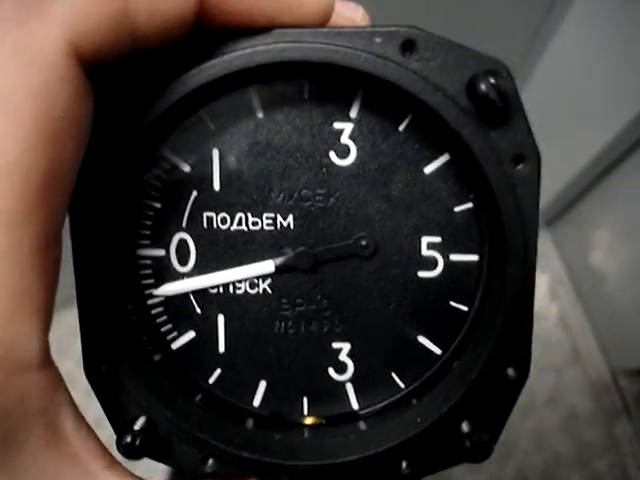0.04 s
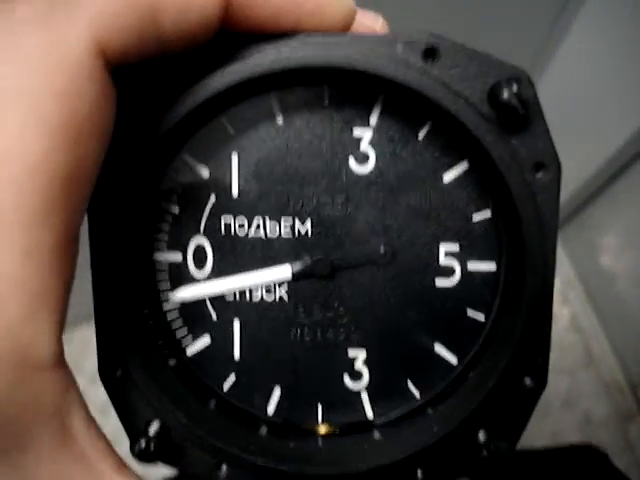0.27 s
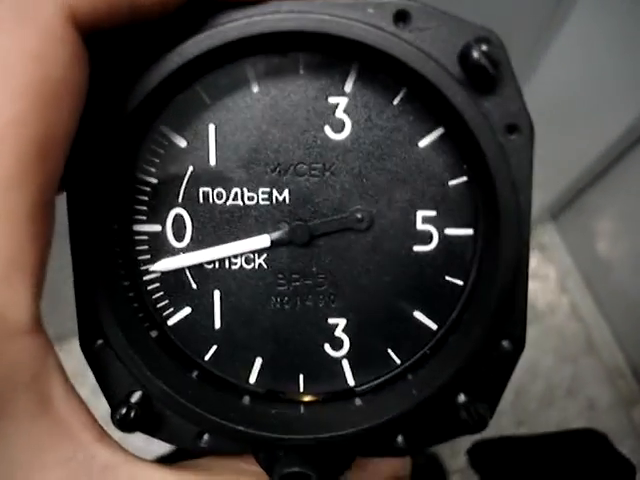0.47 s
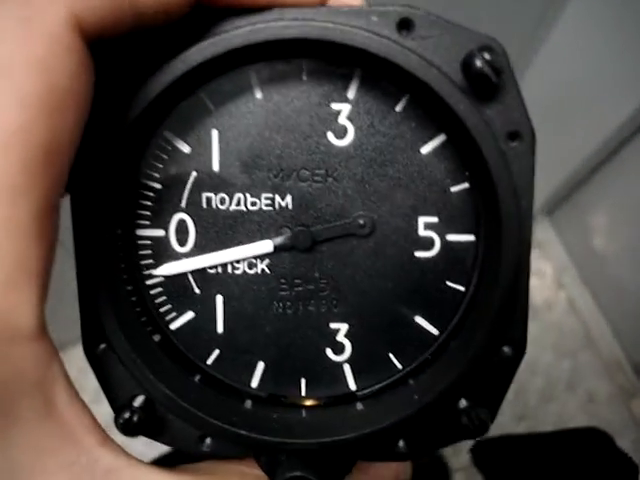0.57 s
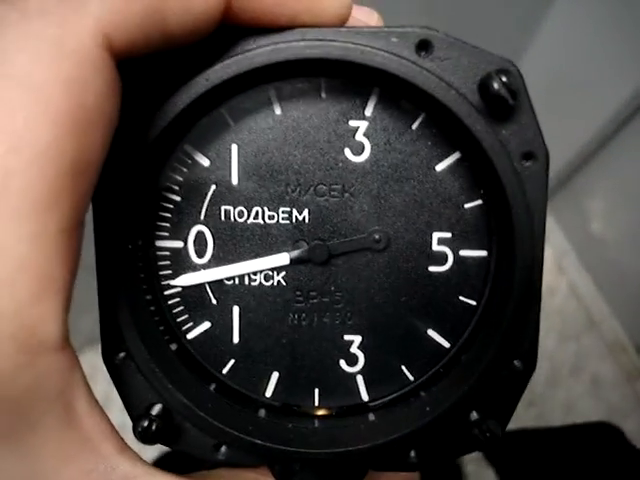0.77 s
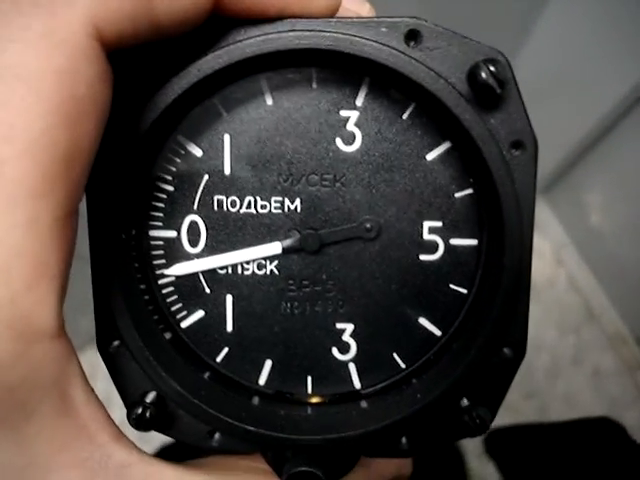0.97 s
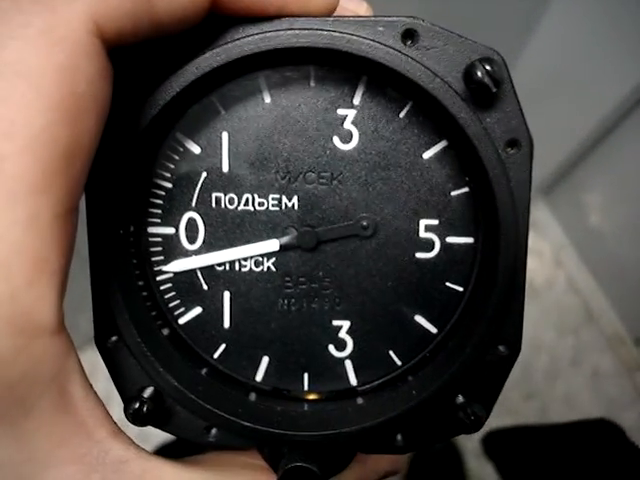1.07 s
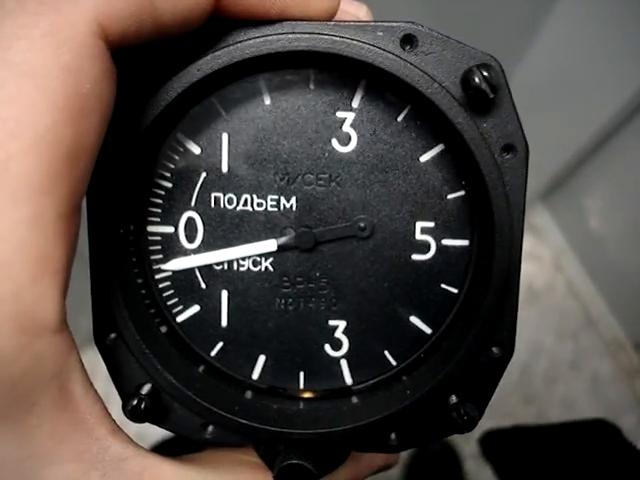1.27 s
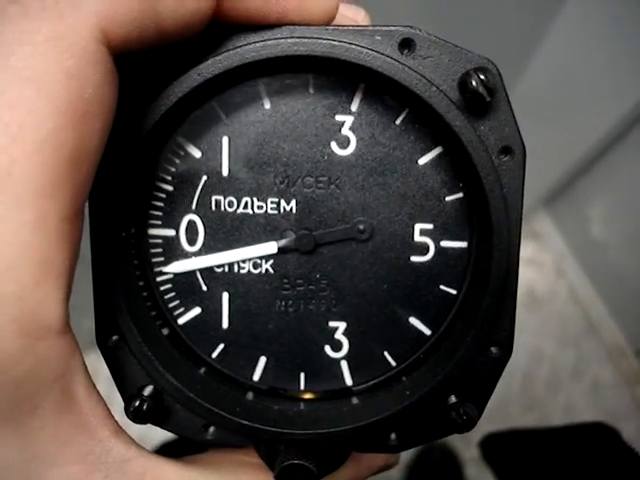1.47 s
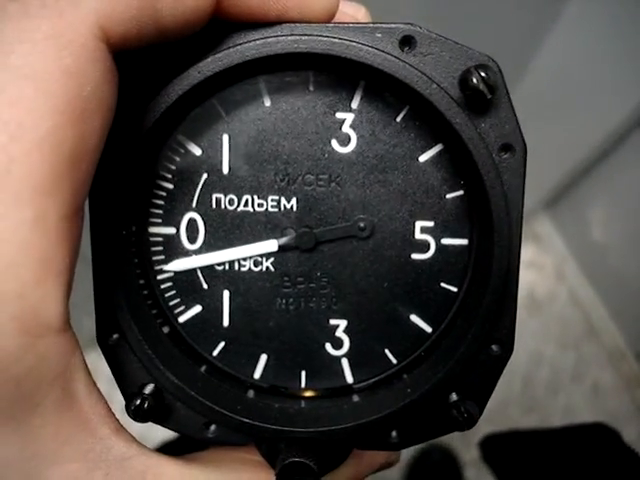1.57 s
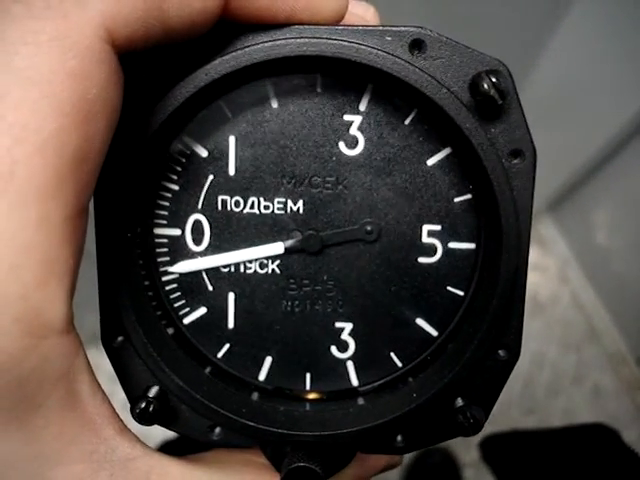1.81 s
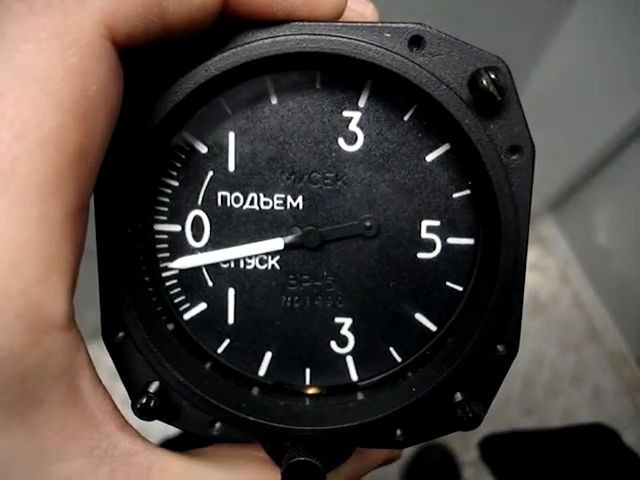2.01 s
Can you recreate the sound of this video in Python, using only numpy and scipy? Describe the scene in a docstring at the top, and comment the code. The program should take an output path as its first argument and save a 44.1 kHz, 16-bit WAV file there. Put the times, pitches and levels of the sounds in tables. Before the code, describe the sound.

A freight elevator's sliding door clanks, rumbles along its track and booms to a stop.

```python
"""A sliding door clanks three times, rumbles and scrapes along its track and booms against its stop,
heard inside a steel freight lift. Impacts excite damped modes of the door and the car walls;
rolling and friction radiate noise. Before the door moves, the drive dies away, a hollow knock
sounds and the lock releases with a thump. Afterwards the car rings on over a faint electrical hum."""
import sys
import numpy as np
from scipy import signal
from scipy.fft import rfft, irfft, next_fast_len
from scipy.io import wavfile
from scipy.ndimage import uniform_filter1d

SR = 44100
rng = np.random.default_rng(int(sys.argv[2]) if len(sys.argv) > 2 else 0)


def unload_wav(signal):
    """Save mono or channel-first audio to the path in sys.argv[1] as 16-bit WAV at rate SR, clipped to [-1, 1]."""
    wavfile.write(
        sys.argv[1],
        SR,
        np.round(np.clip(np.atleast_2d(signal).T, -1, 1) * 32767).astype(np.int16),
    )


N = 90404
T = np.arange(N) / SR


def undb(db):
    """Amplitude ratio of a level in decibels."""
    return 10 ** (np.asarray(db) / 20)


def at(table, hz):
    """Interpolation on a logarithmic frequency axis."""
    f, values = np.array(table, float).T
    return np.interp(np.log(np.maximum(hz, 1)), np.log(f), values)


def unit(x):
    """Normalisation to rms 1."""
    return x / np.std(x)


def colour(x, spectrum):
    """Spectral shaping by a table of relative levels, at rms 1."""
    size = next_fast_len(N)
    gain = undb(at(spectrum, np.arange(size // 2 + 1) * SR / size))
    return unit(irfft(rfft(x, size) * gain, size)[:N])


def noise(spectrum):
    """Spectrally shaped Gaussian noise at rms 1."""
    return colour(rng.standard_normal(N), spectrum)


def walk(rate):
    """Smooth random fluctuation of spread 1, with `rate` new values a second."""
    step = max(int(SR / rate), 2)
    stairs = np.repeat(rng.standard_normal(N // step + 1), step)
    return unit(uniform_filter1d(stairs, step)[:N])


def grains(spread_db, rate):
    """Dense tiny contacts of uneven strength, as amplitude-modulated noise."""
    return unit(rng.standard_normal(N) * undb(spread_db * walk(rate)))


def tone(hz, waver_rad, rate):
    """Sinusoid with random phase modulation, at rms 1."""
    return np.sqrt(2) * np.sin(2 * np.pi * hz * T + waver_rad * walk(rate))


def rise(start, length):
    """Linear attack from 0 to 1."""
    return np.clip((T - start) / length, 0, 1)


def fade(start, t60):
    """Exponential decay of 60 dB in t60 seconds."""
    return np.exp(-np.log(1000) * np.maximum(T - start, 0) / t60)


def envelope(curve):
    """Gain along a level curve, silent before it and decaying after it."""
    times, db = np.array(curve).T
    return undb(np.interp(T, times, db)) * rise(times[0], 0.034) * fade(times[-1], 0.89)


def ring(start, modes, attack, waver_rad):
    """Superposition of damped modes; reflections in the car make each phase waver."""
    onset = int(start * SR)
    count = N - onset
    motion = 0
    for i, (hz, db, t60) in enumerate(modes):
        phase = 2 * np.pi * hz * T[:count] + waver_rad * walk(45.2)[onset:]
        motion += (-1) ** i * undb(db) * fade(0, t60)[:count] * np.sin(phase)
    return np.pad(motion, (onset, 0)) * rise(start, attack)


def walls(start, spectrum, attack, t60_scale, echo_db, echo_t60, spread_db):
    """Modal overlap: wall modes merge into noise, each octave decays at its own rate, the shaft echoes."""
    # decay of the steel car: f/Hz, T60/s before t60_scale
    decay = [(60, 0.49), (300, 0.97), (1000, 0.2), (2500, 0.31), (8000, 0.16)]
    rest = colour(grains(spread_db, 900), spectrum)
    echo = undb(echo_db) * noise(spectrum) * fade(start, echo_t60) * rise(start, 0.048)
    wash = 0
    for hz in np.geomspace(75, 9600, 8):
        band = signal.sosfiltfilt(signal.butter(2, hz * np.sqrt(2), fs=SR, output="sos"), rest)
        rest = rest - band
        wash += band * fade(start + attack, t60_scale * at(decay, hz))
    return wash * rise(start, attack) + echo


def shaft_air():
    """Air in the shaft gives stationary broadband noise."""
    # air spectrum: f/Hz, relative level/dB
    spectrum = [(18, -20.5), (30, 0), (195, -11.5), (295, -15), (424, -19.5), (503, -17.5), (994, -21.5),
                (2630, -25.5), (3270, -25), (10000, -36.5), (13000, -72), (22000, -120)]
    return undb(-51.5) * noise(spectrum)


def hum():
    """Electrical hum and a thin whine: narrow spectral lines with slight random modulation."""
    # faint partials: f/Hz, level/dB
    partials = [(43, -60.5), (88, -65.5), (497, -67.5)]
    # course of the strongest partial: t/s, level/dB
    main_curve = [(0, -41.5), (.2, -63), (.4, -35.5), (.6, -46), (1.3, -47), (1.6, -48.5), (1.73, -66),
                  (1.83, -69.5), (1.93, -56.5), (2.05, -63.5)]
    faint = sum(undb(db + 0.86 * walk(23)) * tone(hz, waver_rad=0.5, rate=9.2) for hz, db in partials)
    main = envelope(main_curve) * tone(hz=288.5, waver_rad=0.41, rate=12)
    whine = undb(-68) * tone(hz=3180, waver_rad=0.66, rate=110)
    return faint + main + whine


def drive():
    """The noise of the drive decays exponentially as it runs down."""
    # drive spectrum: f/Hz, relative level/dB
    spectrum = [(25, -3), (42, 5), (70, -5.5), (150, -1.5), (230, -11.5), (400, -9), (560, -15.5),
                (1120, -20), (1600, -22), (5300, -29), (10000, -46.5)]
    stop_s, time_constant_s = 0.2, 0.3
    return undb(-37) * noise(spectrum) * np.exp(-np.maximum(T - stop_s, 0) / time_constant_s)


def knock():
    """Impulse response of a hollow steel frame to a padded blow."""
    # distinct frame modes: f/Hz, relative level/dB, T60/s
    modes = [(294.4, 0, 0.37), (383.4, -8, 0.47), (439, -11, 0.3), (511, -11, 0.42), (650, -14.5, 0.45),
             (817, -6.5, 0.3), (826, -0.5, 0.13), (869, -3, 0.2), (1020, -29, 0.097), (1192, -11, 0.5),
             (1214, -3, .16), (1380, -3, 0.083), (1587, -8.5, 0.073), (1790, -8.5, 0.16)]
    # spectrum of the dense modes: f/Hz, relative level/dB
    spectrum = [(100, -24), (240, -4.5), (330, -4), (850, 1.5), (1300, 0), (1800, -7), (2400, -16),
                (3000, -21.5), (3650, -11.5), (4500, -27.5), (5400, -19), (10000, -34.5)]
    start = 0.208
    dense = walls(start, spectrum, attack=0.0023, t60_scale=1.37,
                  echo_db=-27.5, echo_t60=0.34, spread_db=1.5)
    return undb(-20.5) * dense + undb(-15.5) * ring(start, modes, attack=0.017, waver_rad=0.53)


def lock():
    """Transient excitation: the lock snaps, crunches open and jolts one low mode of the floor."""
    # spectra of the snap and the crunch: f/Hz, relative level/dB
    snap_spectrum = [(400, 8), (1300, -6), (3500, -9), (6000, -1), (10000, -21)]
    crunch_spectrum = [(35, 17), (90, 1.5), (200, 5), (500, 8), (850, 3.5), (1250, 4), (2000, 2),
                       (3000, -9), (6000, -13), (10000, -56)]
    # lock modes: f/Hz, relative level/dB, T60/s
    modes = [(525, -10, 0.41), (706, -2, .45), (980, -18, .3), (1258, 2, 0.35), (1770, -3, 0.41),
             (2020, -2.5, 0.17), (2530, -15, 0.12)]
    start = 0.443
    floor_hz, floor_db, floor_t60 = 50.6, -38, 0.45
    snap = colour(grains(1.3, 900), snap_spectrum) * rise(start, 0.003) * fade(start, 0.21)
    crunch = walls(start, crunch_spectrum, attack=0.017, t60_scale=0.89,
                   echo_db=-35, echo_t60=0.28, spread_db=-0.5)
    metal = ring(start, modes, attack=0.011, waver_rad=0.2)
    thump = ring(start, [(floor_hz, floor_db, floor_t60)], attack=0.038, waver_rad=0.2)
    return undb(-24.5) * snap + undb(-18.5) * crunch + undb(-28) * metal + thump


def squeaks():
    """Friction: each brief slip in the guides drives one high resonance with noise."""
    # slips: t/s, level/dB, f/Hz, bandwidth/Hz of one filter pass
    slips = [(1.055, -38, 7400, 600), (1.176, -42.5, 4800, 2200), (1.278, -43, 5660, 2000)]
    sound = 0
    for start, db, hz, width in slips:
        b, a = signal.iirpeak(hz, hz / width, fs=SR)
        band = unit(signal.lfilter(b, a, signal.lfilter(b, a, rng.standard_normal(N))))
        sound += undb(db) * band * rise(start, 0.0056) * fade(start, 0.1)
    return sound


def door_travel():
    """Random forced vibration: the rollers rumble, the guides scrape and the car shudders."""
    # courses of the three vibrations: t/s, level/dB
    roll_curve = [(.45, -20.5), (.57, -39), (.63, -24.5), (.78, -25.5), (.87, -31.5), (.96, -25),
                  (1.04, -23.5), (1.15, -32.5), (1.25, -40.5), (1.45, -51.5), (1.75, -60)]
    scrape_curve = [(.6, -65), (.675, -33), (.72, -39.5), (.78, -28.5), (.87, -41.5), (.94, -30),
                    (.98, -28), (1.01, -25), (1.06, -34), (1.15, -43.5), (1.35, -56)]
    shudder_curve = [(.44, -39), (.7, -40.5), (.85, -46), (1.1, -38), (1.3, -40), (1.5, -49.5), (1.68, -52)]
    # their spectra: f/Hz, relative level/dB
    roll_spectrum = [(40, -29), (120, -13.5), (170, -4.5), (255, 1.5), (330, -4.5), (480, -9), (700, -14.5),
                     (1200, -30.5), (3000, -31), (10000, -82)]
    scrape_spectrum = [(300, 9), (700, -1), (1500, 4.5), (2500, -5), (4200, -4.5), (6500, -11),
                       (8500, -18.5), (10000, -32)]
    shudder_spectrum = [(22, -15), (42, -1), (62, -12.5), (88, -3.5), (120, -13), (250, -43.5), (1000, -89)]
    rumble = envelope(roll_curve) * colour(grains(1.6, 60.16), roll_spectrum)
    scrape = envelope(scrape_curve) * colour(grains(1.5, 350), scrape_spectrum)
    shudder = envelope(shudder_curve) * noise(shudder_spectrum)
    return rumble + scrape + shudder


def door_booms():
    """Modal excitation: bumps ring the door panel, softer ones favouring its lower modes."""
    # bumps: t/s, level/dB, f/Hz of strongest excitation, attack/s
    bumps = [(0.131, -19.5, 101, 0.018), (.598, -14.5, 212, 0.019), (.741, -17.5, 274, 0.022),
             (.895, -21.5, 330, 0.012), (.932, -12, 255, 0.019), (0.994, -13.5, 103, 0.015),
             (1.02, -23, 450, 0.016), (1.105, -22, 158, 0.0207)]
    # panel modes: f/Hz, relative level/dB, T60/s
    modes = [(94.5, -13.5, 0.51), (153.1, -8, .9), (198.3, -5, 0.43), (251, -0.5, 0.46), (281, -3.5, .45),
             (358.5, -13.5, 0.99), (392.9, -6.5, .7), (486.4, -8, 0.48), (530, -25, 0.17)]
    fall_db = 13.5  # one octave from the centre, growing with the square of the interval
    sound = 0
    for start, db, centre_hz, attack in bumps:
        excited = [(hz, level - fall_db * np.log2(hz / centre_hz) ** 2, t60) for hz, level, t60 in modes]
        sound += undb(db) * ring(start, excited, attack, waver_rad=0.33)
    return sound


def door_clanks():
    """Impact of steel on steel: a crack and one rebound, then free vibration of parts and walls."""
    # impacts: t/s, wash level/dB, low-pass f/Hz, mode level/dB, crack level/dB re wash, T60 scale
    impacts = [(0.5822, -13.5, 12000, -23.5, 2.5, 0.83), (0.7059, -18.5, 7750, -28.5, 2.5, 0.91),
               (.883, -24, 3150, -33.5, 6, 0.99)]
    # modes of the struck parts: f/Hz, relative level/dB, T60/s
    modes = [(669, -10, .6), (729, -10, .7), (1302, -7, .7), (1456, -6, .5), (1570, -6, .37),
             (1680, 0, .35), (1919, -2, .35), (2173, -1, .33), (2697, -3, .23), (2742, -4, .5),
             (2964, -3, .3), (3198, -5, .24), (3967, -4, .2), (4540, -8, .33)]
    # spectra of the walls' wash and the crack: f/Hz, relative level/dB
    wash_spectrum = [(100, -3.5), (400, 1.5), (700, -7.5), (1000, -5), (1500, -0.5), (2100, 1),
                     (3000, -1.5), (4200, -5), (6000, -12), (10000, -23.5)]
    crack_spectrum = [(300, -27), (1300, -19.5), (2000, 5.5), (3200, 3.5), (4300, -4.5), (6000, -9.5),
                      (10000, -22.5)]
    crack_t60, rebound_s, rebound_db = 0.032, 0.026, -15.5
    sound = 0
    for start, db, cutoff_hz, modes_db, crack_db, t60_scale in impacts:
        wash = walls(start, wash_spectrum, attack=0.0016, t60_scale=t60_scale,
                     echo_db=-15, echo_t60=0.55, spread_db=2.5)
        contacts = sum(undb(level) * rise(t, 0.0014) * fade(t, crack_t60)
                       for t, level in [(start, 0), (start + rebound_s, rebound_db)])
        crack = undb(crack_db) * contacts * noise(crack_spectrum)
        parts = undb(modes_db) * ring(start, modes, attack=0.0025, waver_rad=0.38)
        low_pass = signal.butter(4, cutoff_hz, fs=SR, output="sos")
        sound += signal.sosfilt(low_pass, undb(db) * (wash + crack) + parts)
    return sound


def scene():
    """Superposition of all sources inside the car, in one channel."""
    background = shaft_air() + hum() + drive()
    return (background + knock() + lock() + squeaks() + door_travel() + door_booms() + door_clanks())[None]


def record(dry):
    """Band limiting and saturation: the microphone cuts deep bass, rounds peaks and cuts the top."""
    low_hz, top_hz = 42, 10000
    high_pass = signal.butter(4, low_hz, "high", fs=SR, output="sos")
    low_pass = signal.ellip(10, 0.2, 70, top_hz, fs=SR, output="sos")
    rounded = np.tanh(signal.sosfilt(high_pass, dry))
    return signal.sosfilt(low_pass, rounded)


dry = scene()
out = record(dry)
unload_wav(out)
```